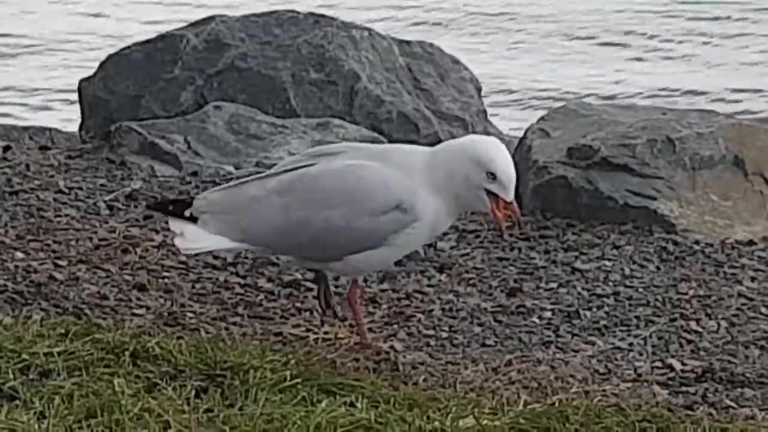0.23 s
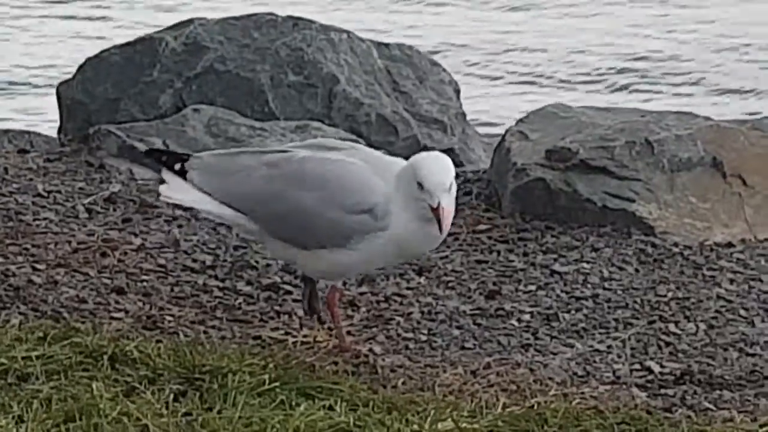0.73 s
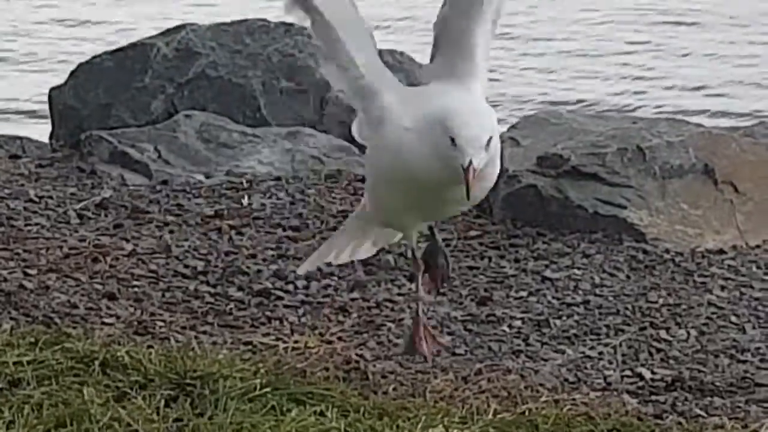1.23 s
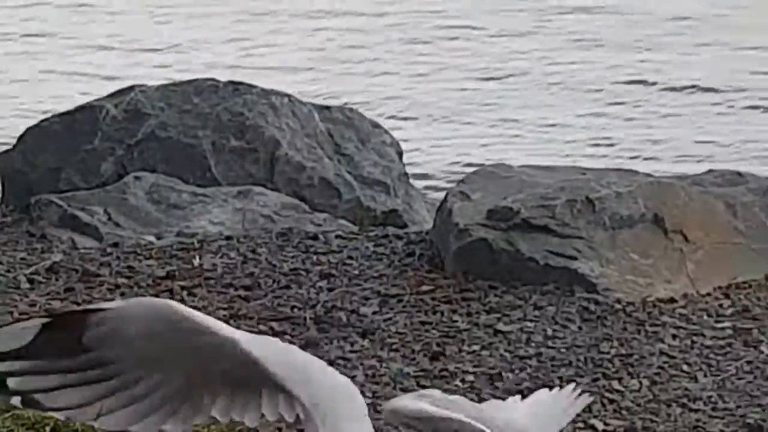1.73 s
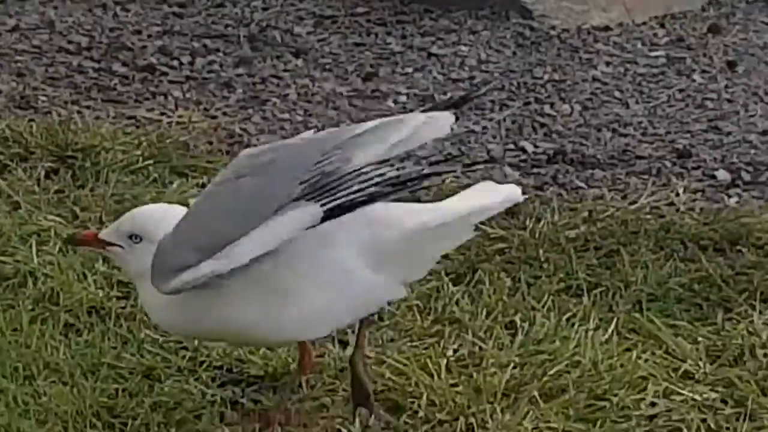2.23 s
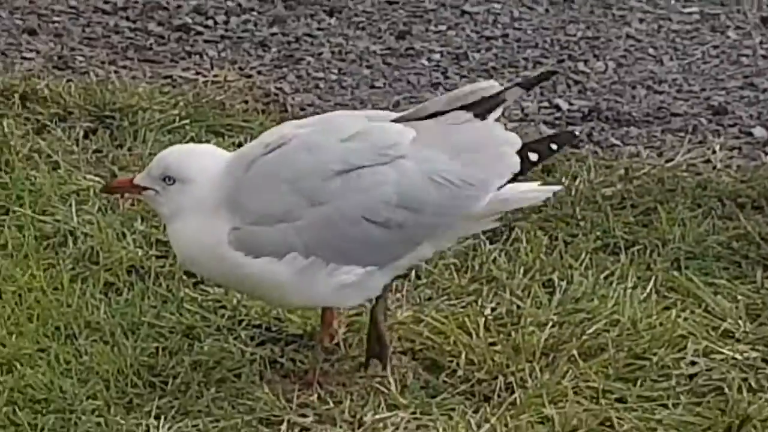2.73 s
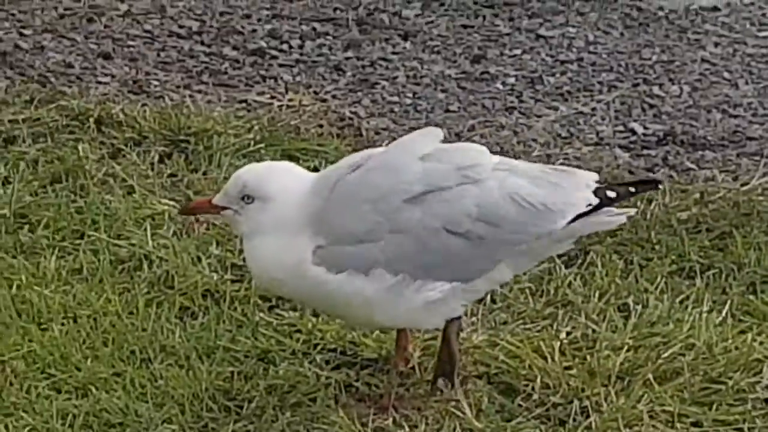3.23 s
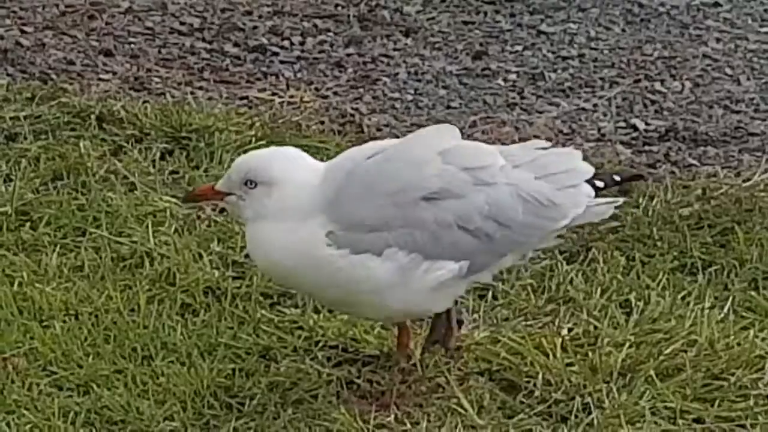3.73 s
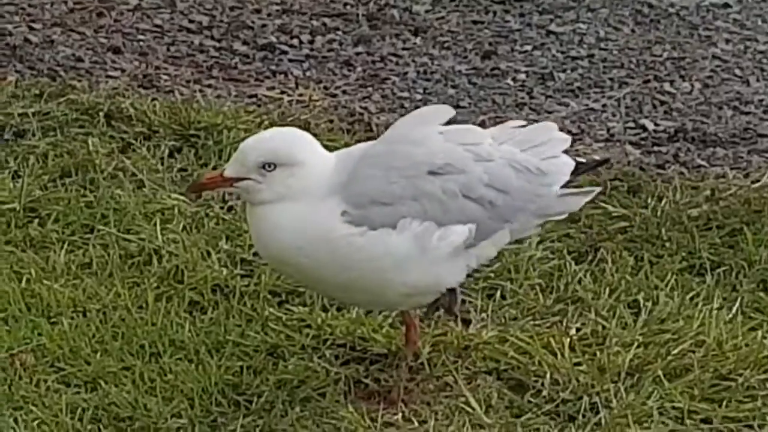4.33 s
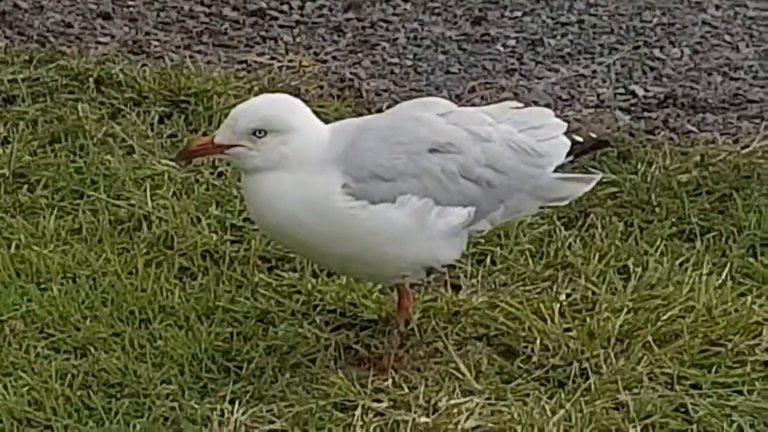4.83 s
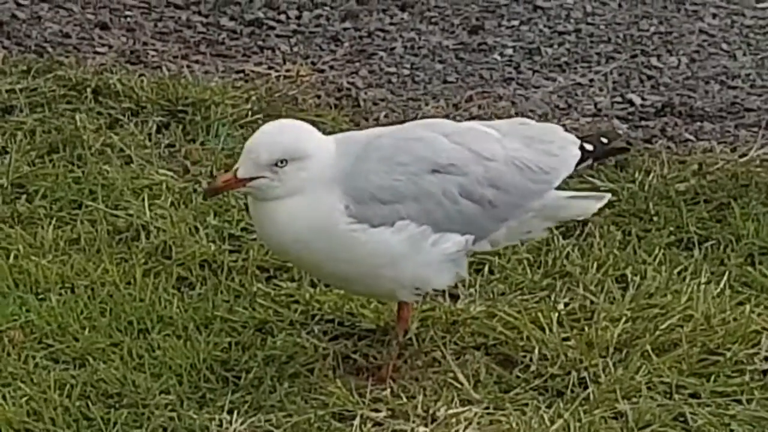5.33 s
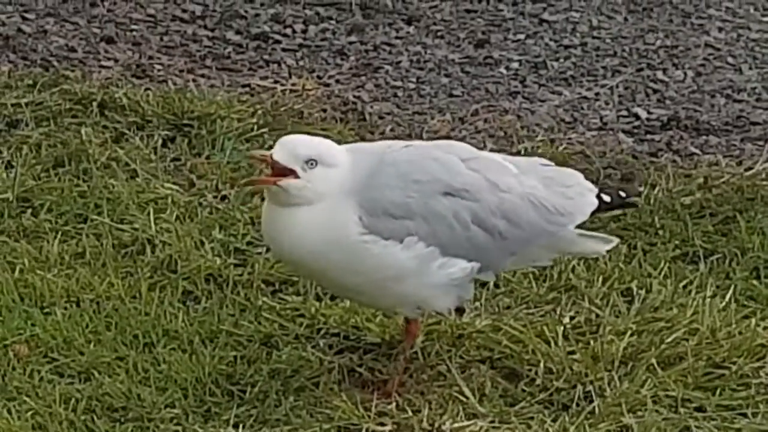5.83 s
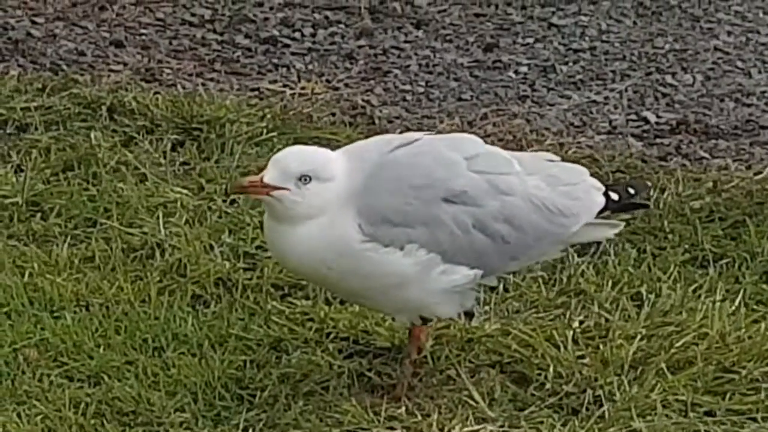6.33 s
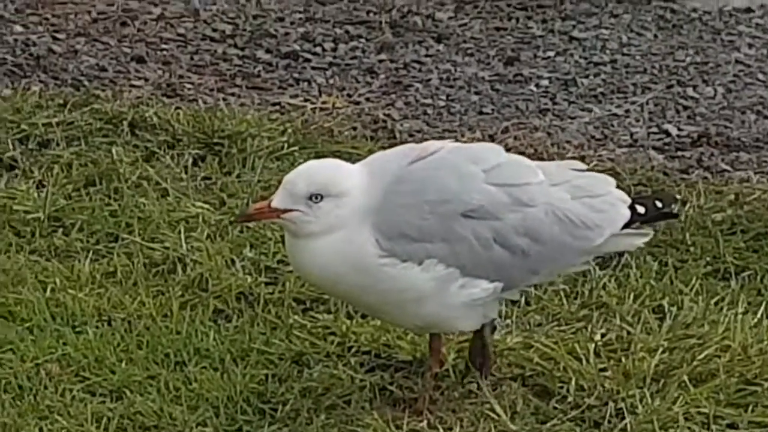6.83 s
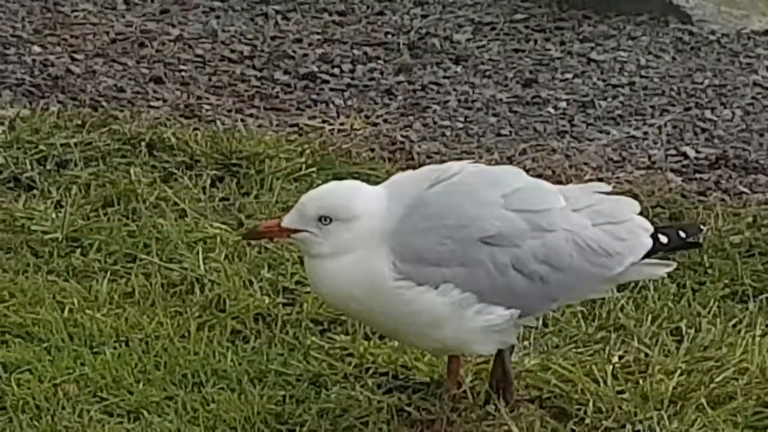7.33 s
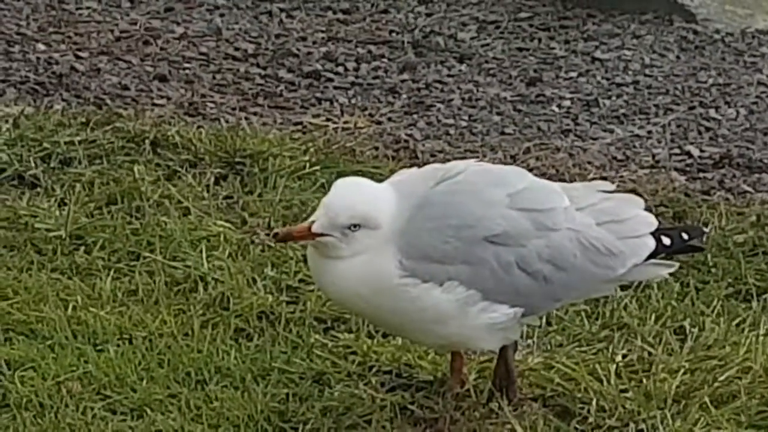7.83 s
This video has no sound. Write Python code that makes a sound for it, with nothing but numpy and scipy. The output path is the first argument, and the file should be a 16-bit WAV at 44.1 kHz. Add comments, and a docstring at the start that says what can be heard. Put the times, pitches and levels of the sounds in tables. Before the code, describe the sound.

Outdoors by the water, a close gull cries hoarsely at once, flaps faintly, cries again, then calls once more after a long pause.

```python
"""A grassy shore: wash of water, slowly rising, a distant engine hum and soft low bumps on the microphone.
At once a gull cries from the gravel to the right: a rasp cracks into a whistle, then a falling tone with
brief whistled breaks. A few wingbeats follow, a second cry from the grass to the left, one more soft stroke.
Late on comes a third cry from the left, then one faint falling chirp far off. The cries are jittering
harmonics with hoarse fringes and chopped air; wash, wings and bumps are coloured noise; the hum is sine lines."""
import sys
import numpy as np
from scipy import signal
from scipy.fft import rfft, irfft, next_fast_len
from scipy.io import wavfile
from scipy.ndimage import uniform_filter1d

SR = 44100
rng = np.random.default_rng(int(sys.argv[2]) if len(sys.argv) > 2 else 0)


def generate_wav(signal):
    """Clip the signal to [-1, 1] and save it as 16-bit WAV at the path in sys.argv[1]."""
    frames = np.transpose(np.atleast_2d(signal))
    scaled = np.clip(frames, -1, 1) * 32767
    pcm = np.round(scaled).astype(np.int16)
    wavfile.write(sys.argv[1], SR, pcm)


N = 355842


def amp(db):
    """Decibels to gain."""
    return 10 ** (np.asarray(db) / 20)


def unit(x):
    """Scales to rms 1."""
    return x / np.sqrt(np.mean(x ** 2) + 1e-20)


def read(points, hz):
    """Reads a spectrum on a log-frequency axis."""
    f, value = np.transpose(points)
    return np.interp(np.log(hz + 1), np.log(f + 1), value)


def colour(x, points):
    """Filters by a dB spectrum, to rms 1."""
    gain = amp(read(points, np.fft.rfftfreq(len(x), 1 / SR)))
    return unit(irfft(rfft(x) * gain, len(x)))


def wander(size, rate_hz):
    """Smooth random drift of rms 1, its spectrum falling off around the rate."""
    full = next_fast_len(size)
    hz = np.fft.rfftfreq(full, 1 / SR)
    lowpass = np.exp(-(hz / rate_hz) ** 2) * (hz > 0)
    return unit(irfft(rfft(rng.standard_normal(full)) * lowpass, full)[:size])


def add(mix, s, sound):
    """Lays a sound into the stereo mix at s seconds."""
    part = mix[:, max(round(s * SR), 0):][:, :sound.shape[1]]
    part += sound[:, :part.shape[1]]


def until(t, s, change_s):
    """1 before the moment s, easing to 0 after it."""
    return .5 - .5 * np.tanh((t - s) / change_s)


def stutter(size, depth_db, rate_hz):
    """A gain that keeps dropping out briefly, as the vibration catches; its mean power is evened out."""
    gain = amp(-depth_db * np.maximum(wander(size, rate_hz), 0))
    return gain / np.sqrt(uniform_filter1d(gain ** 2, size=1500))


def puffs(rows, spectrum, likeness):
    """Short swells of coloured noise, partly shared by the two ports; rows of (centre_s, width_s, level_db)."""
    out, likeness = np.zeros((2, N)), np.clip(likeness, 0, 1)
    t = np.arange(-SR // 4, SR // 4) / SR
    for s, width_s, level_db in rows:
        shared, left, right = (colour(rng.standard_normal(len(t)), spectrum) for _ in range(3))
        noise = np.sqrt(likeness) * shared + np.sqrt(1 - likeness) * np.array([left, right])
        swell = np.exp(-(t / width_s) ** 2)
        add(out, s + t[0], amp(level_db) * swell * noise)
    return out


# colour of the steady wash at each microphone port, relative: pitch_hz, density_db
WASH_LEFT = [(20, -24.5), (80, 2.5), (150, -3), (200, -5), (420, -8.5), (750, -14), (890, -12.5),
             (1050, -15.5), (1500, -15), (2250, -18.5), (2600, -25.5), (4300, -38.5), (9500, -46),
             (14000, -41)]
WASH_RIGHT = [(20, -19), (80, -1.5), (150, -7), (200, -7), (420, -9), (750, -13.5), (890, -11), (1150, -11),
              (1500, -9.5), (2250, -18), (2600, -23), (4300, -35.5), (9800, -45.5), (14000, -42)]
# how alike the two ports hear the wash: pitch_hz, likeness (0-1)
WASH_LIKENESS = [(60, 0.43), (250, 0.63), (520, 0.48), (750, 0.69), (900, 0.77), (2250, 1), (2600, 0.057),
                 (3200, 0.057), (3900, 0.037)]
WASH_START_DB, WASH_RISE_DB_PER_S = -49, 0.1644


def shore(patchy_db=1.66, lag_s=0.00038):
    """The wash of water and distance: noise drifting in soft patches; it reaches the left port first."""
    frames, hz = N // 512 + 5, np.fft.rfftfreq(2048, 1 / SR)
    a, b, c, d, patches = rng.standard_normal((frames, len(hz), 5)).T
    # smoothed across pitch and time
    patches = unit(uniform_filter1d(uniform_filter1d(patches, size=14, axis=0), size=12, axis=1))
    same = np.clip(read(WASH_LIKENESS, hz), 0, 1)[:, None]
    lag = lag_s * np.clip((hz - 400) / 800, 0, 1)  # the bass has no direction
    turn = np.exp(-2j * np.pi * hz * lag)[:, None]
    left = a + 1j * b
    right = same * left * turn + np.sqrt(1 - same ** 2) * (c + 1j * d)
    left_wash = left * amp(read(WASH_LEFT, hz))[:, None]
    right_wash = right * amp(read(WASH_RIGHT, hz))[:, None]
    frames_both = np.array([left_wash, right_wash]) * amp(patchy_db * patches)
    wash = unit(signal.istft(frames_both, nperseg=2048, noverlap=1536)[1][:, :N])
    return wash * amp(WASH_START_DB + WASH_RISE_DB_PER_S * np.arange(N) / SR)


# lines of the distant engine, before the left-right balance: pitch_hz, level_db
ENGINE_LINES = [(75.6, -61.5), (151.2, -57), (418, -69.5), (480, -68.5), (553, -69), (894, -69)]


def engine(waver_hz=1.52, throb_db=3.5, left_db=-1.5):
    """A few lines from a far engine: they waver together with its speed and each fades on its own."""
    hum = np.zeros(N)
    speed = waver_hz * wander(N, 7.34) / ENGINE_LINES[1][0]  # the waver in Hz is that of the second line
    for hz, level_db in ENGINE_LINES:
        phase = 2 * np.pi * np.cumsum(hz * (1 + speed)) / SR
        throb = amp(throb_db * wander(N, 3.7))
        hum += amp(level_db) * unit(np.sin(phase) * throb)
    return hum * amp([[left_db], [-left_db]])


# course of the far chirp: time_s, pitch_hz, level_db
FAR_CHIRP = [(6.52, 5400, -80), (6.55, 4300, -77), (6.565, 3850, -66), (6.58, 3550, -78)]


def small_bird():
    """One faint chirp far away: a single sine gliding down with a fast waver."""
    s, hz, level_db = np.transpose(FAR_CHIRP)
    t = np.arange(s[0], s[-1], 1 / SR)
    pitch = np.interp(t, s, hz) * (1 + .02 * wander(len(t), 300))
    phase = 2 * np.pi * np.cumsum(pitch) / SR
    chirp = amp(np.interp(t, s, level_db)) * unit(np.sin(phase))
    out = np.zeros((2, N))
    add(out, s[0], chirp[None])
    return out


# low bumps on the microphone: centre_s, width_s, level_db
MIC_BUMPS = [(.25, 0.027, -50), (3.405, 0.0084, -45), (3.44, 0.019, -42), (3.66, 0.011, -37),
             (3.681, 0.011, -33), (4.02, 0.019, -38.5), (4.37, 0.018, -42), (4.465, 0.047, -44.5),
             (5.64, 0.0067, -38.5), (5.9, 0.13, -47.5), (6.29, 0.14, -45.5), (6.425, 0.027, -43.5),
             (7.82, 0.035, -40)]
# their colour: pitch_hz, gain_db
MIC_BUMP_COLOUR = [(20, -9), (60, -3), (110, 1), (200, -7.5), (330, -12.5), (600, -28), (2000, -67)]


def bumps():
    """Soft low bumps on the microphone: swells of bass noise, mostly different at the two ports."""
    return puffs(MIC_BUMPS, MIC_BUMP_COLOUR, likeness=0.22)


# strokes of the wings: centre_s, width_s, level_db
WING_STROKES = [(1.15, 0.068, -66), (1.455, 0.03, -63.5), (1.61, 0.027, -64), (2.3, 0.18, -69.5)]
# colour of the air in the feathers: pitch_hz, gain_db
FEATHER_COLOUR = [(1500, -7), (4000, 4), (7500, 4), (10000, -5), (14000, -0.5)]


def wingbeats():
    """The gull's wings: faint swells of airy noise."""
    return puffs(WING_STROKES, FEATHER_COLOUR, likeness=0.25)


# the voice cracks into a whistle: start_s, end_s, pitch_hz, level_db
WHISTLES = [(0.09, 0.122, 3283, -26.5), (0.124, 0.165, 3283, -27.5), (0.168, 0.238, 3320, -30),
            (0.237, 0.275, 3335, -39), (0.292, 0.441, 3260, -57), (0.447, 0.457, 3190, -34.5),
            (0.484, 0.493, 3128, -36), (0.499, 0.509, 3070, -34), (0.545, 0.554, 3000, -40),
            (0.591, .599, 2960, -35), (5.891, 5.918, 2680, -44)]


def whistle(t, carrier, waver=0.0095, flutter_db=4, octave_db=-8.0, third_db=-20, fourth_db=-27,
            half_db=-17, sum_db=-8, sum_top_db=-40, edge_s=0.0024):
    """A second, higher vibration of the syrinx; returns its sound and how far it takes over."""
    level = 0
    for start, end, _, db in WHISTLES:
        level = level + amp(db) * np.clip(np.minimum(t - start, end - t) / edge_s + .5, 0, 1)
    start, end, hz, level_db = np.transpose(WHISTLES)
    pitch = np.interp(t, (start + end) / 2, hz) * (1 + waver * wander(len(t), 400))
    phase = 2 * np.pi * np.cumsum(pitch) / SR
    overtones = sum(amp(db) * np.cos(k * phase) for k, db in enumerate([octave_db, third_db, fourth_db], 2))
    stack = np.cos(phase) + overtones * np.sqrt(level / amp(np.max(level_db)))  # a weak whistle is purer
    # strong and weak cycles alternate at times
    stack += amp(half_db) * wander(len(t), 130) * np.cos(phase / 2)
    # the two vibrations modulate each other: a side tone at the sum of their pitches
    sum_level = np.minimum(level * amp(sum_db), amp(sum_top_db))
    sum_tone = sum_level * np.cos(phase + carrier) * stutter(len(t), 13, 120)
    shrill = level * unit(stack) * stutter(len(t), flutter_db, 238)
    return shrill + sum_tone, np.clip(level / amp(-31.5), 0, .9)


# a beat in the syrinx splits the harmonics: start_s, end_s, beat_hz, level_db
HARMONIC_SPLITS = [(0.278, 0.617, 297, -52), (1.957, 2.127, 249, -55.5), (2.181, 2.218, 270, -55)]
# tones beside the harmonics: harmonic, side (-1 below, +1 above), gain_db
SPLIT_TONES = [(2, 1, -2), (3, 1, -2), (4, -1, -3), (4, 1, -2)]


def double_voice(t, carrier, waver=0.202, edge_s=0.022, flutter_db=5):
    """Unsteady side tones a beat away from the harmonics."""
    out = np.zeros(len(t))
    for start, end, beat_hz, level_db in HARMONIC_SPLITS:
        beat = 2 * np.pi * np.cumsum(beat_hz * (1 + waver * wander(len(t), 118))) / SR
        tones = sum(amp(db) * np.cos(k * carrier + side * beat) for k, side, db in SPLIT_TONES)
        window = until(t, end, edge_s) - until(t, start, edge_s)
        out += amp(level_db) * window * tones
    return out * stutter(len(t), flutter_db, 150)


AIR_LIKENESS = 0.28  # share of the rushing air that both ports hear alike


def rushing_air(phase):
    """Noise chopped at each cycle, for both ports."""
    alike = np.clip(AIR_LIKENESS, 0, 1)
    shared, *own = rng.standard_normal((3, len(phase)))
    air = np.sqrt(alike) * shared + np.sqrt(1 - alike) * np.array(own)
    return air * (1 + 1.17 * np.cos(phase))


# the voice catches briefly: centre_s, width_s, gain_db
VOICE_CATCHES = [(0.084, 0.0041, -3.5), (1.769, 0.005, -23), (1.826, 0.0023, -7.5), (5.903, 0.011, -10.5),
                 (6.047, 0.034, -4)]
ATTACK_S, OPEN_S, CLEAR_S, RELEASE_S = 0.012, 0.021, 0.058, 0.036  # how long each change of a cry takes
ROUGH_CROAK, ROUGH_PUSH = 0.551, 0.162  # roughness added in the croak and in the push


def effort(row):
    """The course of one cry: times, tone dB, rasp dB, roughness and the gate that starts and stops it."""
    start, opens, clears, fades, end, tone_db, rasp_db, *changes, rough = row
    tone_push_db, rasp_push_db, tone_fade_db, rasp_fade_db, swell_db = changes
    t = np.arange(start, end, 1 / SR)
    push = until(t, clears, CLEAR_S)
    fade = np.interp(t, [fades, end], [0, 1])
    catch_db = sum(db * np.exp(-((t - s) / width_s) ** 2) for s, width_s, db in VOICE_CATCHES)
    tone_db = tone_db + tone_push_db * push + tone_fade_db * fade + catch_db
    rasp_db = rasp_db + rasp_push_db * push + rasp_fade_db * fade + catch_db
    rasp_db = rasp_db - swell_db * np.interp(t, [start, opens], [1, 0])
    rough = np.clip(rough + ROUGH_PUSH * push + ROUGH_CROAK * until(t, opens, OPEN_S), 0, 1)
    gate = np.clip(np.minimum((t - start) / ATTACK_S, (end - t) / RELEASE_S), 0, 1)
    return t, tone_db, rasp_db, rough, gate


# colour of the hoarse croak: pitch_hz, gain_db
CROAK_COLOUR = [(400, -5), (950, 7.5), (1400, -19), (1950, 10.5), (3200, -1), (3900, -8), (4800, -15.5),
                (6000, -32), (7500, -7), (9500, -23), (14500, -20)]
# the beak starts to open at this rasp level and is wide this much above it
BEAK_SHUT_DB, BEAK_RANGE_DB = -45.5, 7.5


def cry(row, pitch, throat, rasp_colour, fundamental_db, brighten, air_db, croak_air_db=-2, halo_hz=170,
        flutter_db=13, flutter_hz=190, beak_hz=4600, beak_width_hz=420, beak_db=10):
    """Jittering harmonics coloured by the throat, each with a hoarse fringe, and air chopped at each cycle."""
    t, tone_db, rasp_db, rough, gate = effort(row)
    size, hz = len(t), np.interp(t, *np.transpose(pitch))
    # at the roughest the cycles lose their order and the tone gives way to a croak
    chaos = np.clip((rough - .4) / .4, 0, 1)
    jitter = .0025 + .015 * rough + .05 * chaos
    phase = 2 * np.pi * np.cumsum(hz * (1 + jitter * wander(size, 372))) / SR
    k = np.arange(1, 14)[:, None]  # harmonic numbers
    harmonics_db = read(throat, k * hz) + fundamental_db * (k == 1)
    # a harder push closes the membranes more sharply and strengthens the upper harmonics
    harmonics_db += brighten * (tone_db - tone_db.max()) * np.log2(k)
    # the beak opens with the rush of air and adds a resonance of its own
    gape = np.clip((rasp_db - BEAK_SHUT_DB) / BEAK_RANGE_DB, 0, 1)
    harmonics_db += beak_db * gape * np.exp(-((k * hz - beak_hz) / beak_width_hz) ** 2)
    heights = amp(harmonics_db)
    partials = np.cos(k * phase + 2 * np.pi * rng.random(k.shape))
    tone = np.sqrt(2) * (heights * partials).sum(0) / np.linalg.norm(heights, axis=0)
    # irregular cycles smear every harmonic into a narrow band of noise
    fringe = unit(sum(wander(size, halo_hz) * np.cos(n * phase) + wander(size, halo_hz) * np.sin(n * phase)
                      for n in k))
    airs = rushing_air(phase)
    rasp = np.array([colour(fringe + amp(air_db) * air, rasp_colour) for air in airs])
    croak = np.array([colour(fringe + amp(croak_air_db) * air, CROAK_COLOUR) for air in airs])
    rasp = (1 - chaos) * rasp + chaos * croak
    shrill, takeover = whistle(t, phase)
    tone_share = (1 - takeover) * np.cos(chaos * np.pi / 3) ** 2
    voice = amp(tone_db) * tone_share * tone + amp(rasp_db) * rasp
    voice = voice * stutter(size, flutter_db * rough, flutter_hz)
    return (voice + shrill + double_voice(t, phase)) * gate


# colour of the right microphone port relative to the left: pitch_hz, gain_db
RIGHT_PORT_COLOUR = [(1000, -0.5), (2200, -4.5), (3300, -2), (4500, 2), (6000, 5.5), (7700, 9),
                     (9500, -3.5), (14000, -5)]


def ports(x, left_lead_samples, right_db):
    """The two microphone ports hear the bird at slightly different times and with different colour."""
    size = x.shape[1]
    hz = np.fft.rfftfreq(size, 1 / SR)
    # half of the difference goes to each port
    half_gain = amp(-(read(RIGHT_PORT_COLOUR, hz) + right_db) / 2)
    half = half_gain * np.exp(1j * np.pi * hz * left_lead_samples / SR)
    return irfft(rfft(x) * np.array([half, 1 / half]), size)


def scatter(x, near_db=-6, near_s=0.0031, near_tilt_db=4, far_db=-32, far_s=.07):
    """A short diffuse spread, tilted to the treble and different at each port, and a faint longer tail."""
    t = np.arange(SR // 3) / SR
    out = x.copy()
    for db, fade_s, tilt_db in [(near_db, near_s, near_tilt_db), (far_db, far_s, 0)]:
        slope = [(f, tilt_db * np.log2(f)) for f in (1000, 12000)]  # tilt in dB per octave
        taps = np.array([colour(rng.standard_normal(len(t)), slope) for _ in range(2)]) * np.exp(-t / fade_s)
        taps *= amp(db) / np.linalg.norm(taps, axis=1, keepdims=True)
        out += signal.fftconvolve(x, taps, axes=1)[:, :N]
    return out


# a cry croaks, opens into a harsh push, clears into a held tone and fades: start_s, opens_s, clears_s,
# fades_s, end_s, held_tone_db, held_rasp_db, tone_push_db, rasp_push_db, tone_fade_db, rasp_fade_db,
# croak_swell_db (of the rasp), held_roughness (0-1)
GULL_CRIES = [(.022, .052, 0.07, 0.59, .703, -35.5, -43, 3, 15, -5, -14, 19, 0.14),
              (1.754, 1.828, 1.985, 2.087, 2.258, -34.5, -50.5, 2, 14, -12.5, -10, 12, 0.04),
              (5.838, 5.918, 6.005, 6.196, 6.388, -35.5, -40.5, 4, 9.5, -3.5, -34, 24, 0.08)]
# pitch arch of each cry: time_s, pitch_hz
ARCH_BOWED = [(0.03, 863.5), (0.052, 1204), (0.078, 1284), (0.192, 1349), (0.51, 1206), (0.612, 1151),
              (0.676, 853), (0.7, 854)]
ARCH_LANDING = [(1.77, 918.2), (1.84, 1092), (1.956, 1119), (2.07, 1085), (2.17, 975), (2.196, 963),
                (2.228, 907), (2.25, 830.2)]
ARCH_STANDING = [(5.85, 1021), (5.892, 1105), (5.978, 1190), (5.992, 1156), (6.04, 1270), (6.052, 1218),
                 (6.096, 1163), (6.25, 1099), (6.385, 925)]
# colour of the throat in each posture: pitch_hz, gain_db
BOWED_THROAT = [(500, -4.5), (900, -0.5), (1600, 4.5), (2100, 4), (2600, 5), (3100, 8), (3900, 6),
                (4700, -14), (5600, -9), (6400, -5), (7700, -15), (9200, -30.5), (14500, -35)]
LANDING_THROAT = [(500, 9), (1000, -9.5), (1450, -1), (2000, 10.5), (2600, -15.5), (3000, 10.5),
                  (3330, 7.5), (3800, -9), (4500, -16.5), (5300, -26), (6100, -23), (7600, -17),
                  (9700, -20), (14500, -50)]
STANDING_THROAT = [(500, -11), (950, 9.5), (1500, -22.5), (2000, 14), (2400, 1.5), (2850, 0), (3450, 5.5),
                   (3900, -6.5), (4650, -2.5), (5500, -31), (6200, -30), (7100, -9.5), (9700, -29),
                   (14500, -27)]
# colour of the rasp with the head bowed and with the beak held forward: pitch_hz, gain_db
BOWED_RASP = [(400, -12), (900, -5), (1650, 7), (2100, -4.5), (2600, -4), (3300, 8.5), (4000, 3.5),
              (4700, 0), (5600, -4.5), (6400, -7.5), (7700, -1), (9200, -22), (10600, -11), (14500, -26.5)]
FORWARD_RASP = [(500, -15), (1000, -10.5), (1500, -6), (2000, 3.5), (2600, 8), (3300, 7.5), (3850, 1),
                (4700, 3.5), (5400, -14), (6200, -15), (7400, -5), (9800, -13.5), (11300, -8.5),
                (14500, -15.5)]


def gull():
    """Three cries: one from the gravel to the right, two from the grass to the left."""
    out = np.zeros((2, N))
    first, second, third = GULL_CRIES
    bowed = cry(first, ARCH_BOWED, BOWED_THROAT, BOWED_RASP,
                fundamental_db=13.5, brighten=1.0, air_db=10.5, beak_db=14)
    landing = cry(second, ARCH_LANDING, LANDING_THROAT, FORWARD_RASP,
                  fundamental_db=6.0, brighten=0.83, air_db=1, beak_db=18.5, flutter_db=9)
    standing = cry(third, ARCH_STANDING, STANDING_THROAT, FORWARD_RASP,
                   fundamental_db=-4.0, brighten=0.42, air_db=4.5, beak_db=1.5)
    # a negative lead reaches the right port first
    add(out, first[0], ports(bowed, left_lead_samples=-1.03, right_db=3.5))
    add(out, second[0], ports(landing, left_lead_samples=1.6, right_db=4.0))
    add(out, third[0], ports(standing, left_lead_samples=1.36, right_db=3.5))
    return scatter(out)


def scene():
    """The shore, the far engine and bird, the bumps on the microphone, and the gull with its wings."""
    return shore() + engine() + small_bird() + bumps() + wingbeats() + gull()


def record(dry, edge_hz=14680):
    """The recorder's band limit: a steep low-pass."""
    lowpass = signal.firwin(511, edge_hz, window=("kaiser", 9), fs=SR)
    return signal.oaconvolve(dry, lowpass[None], "same")


dry = scene()
out = record(dry)
generate_wav(out)
```